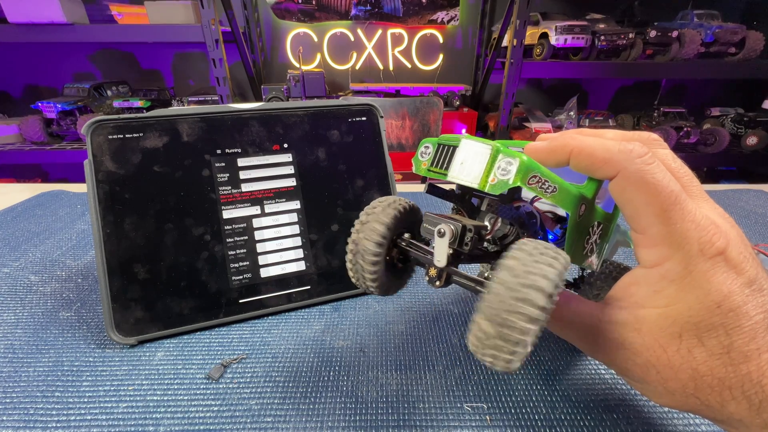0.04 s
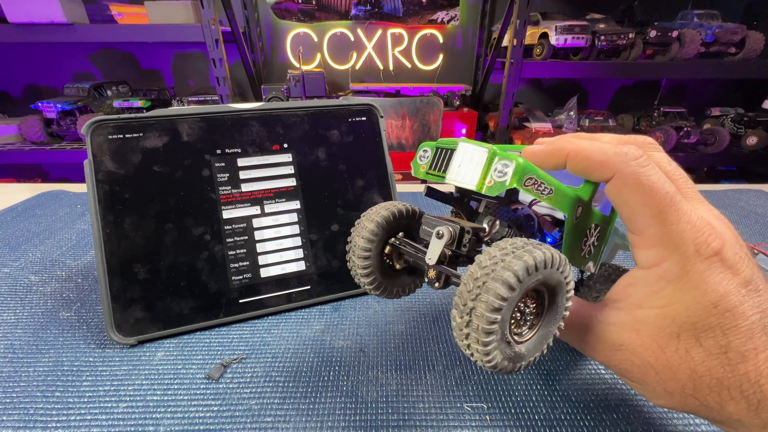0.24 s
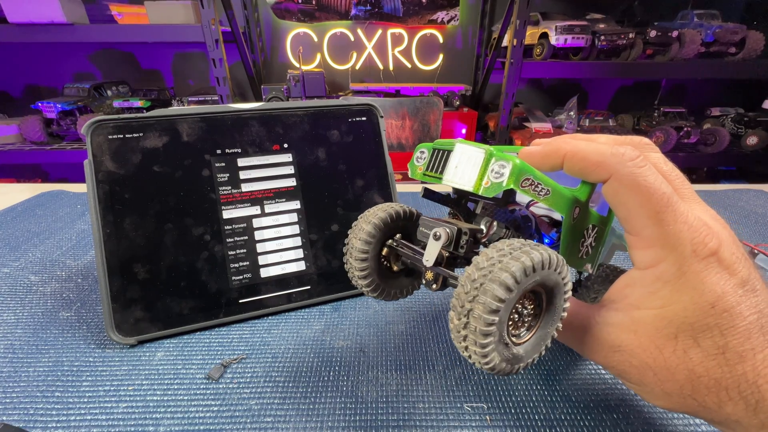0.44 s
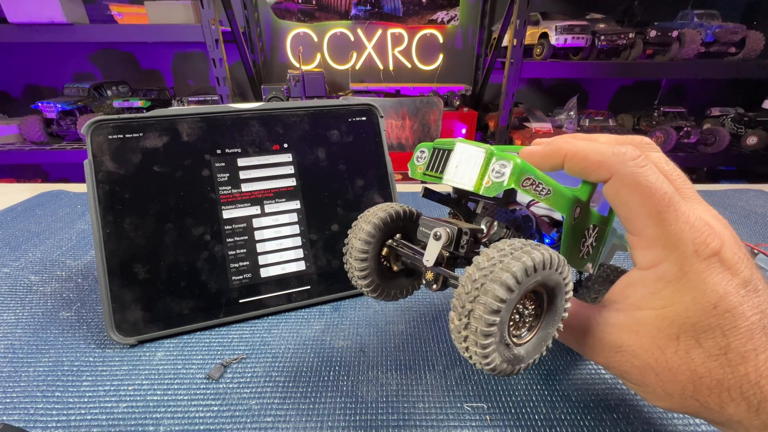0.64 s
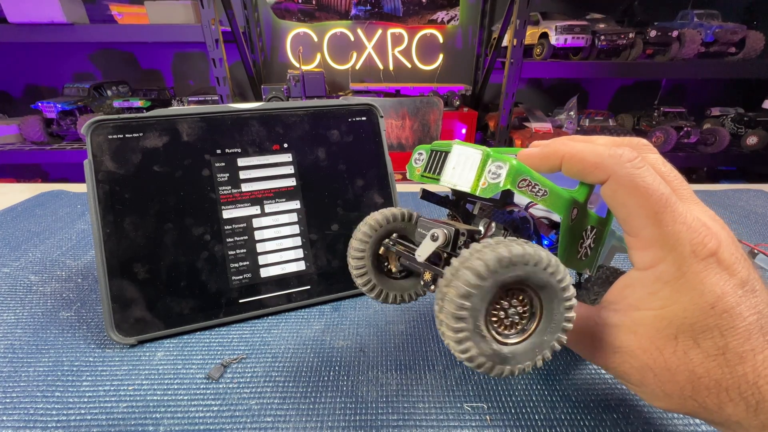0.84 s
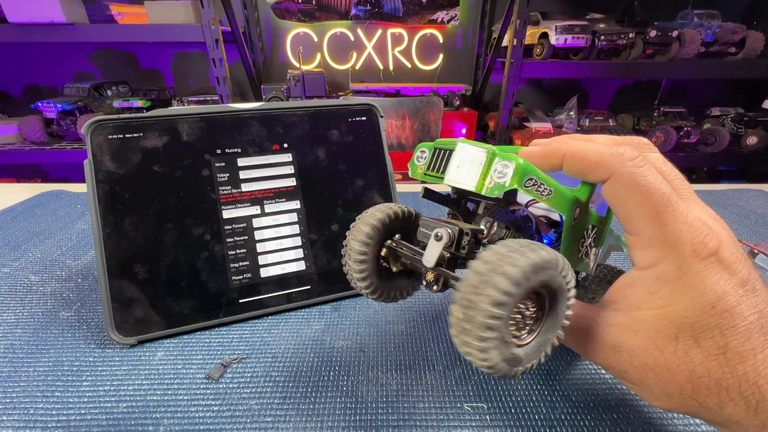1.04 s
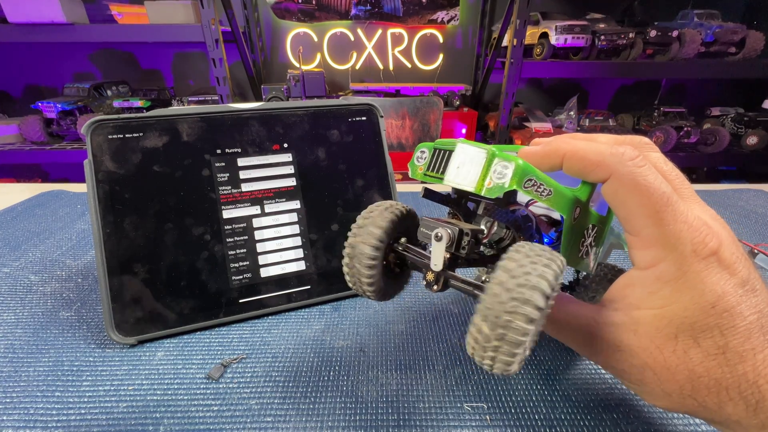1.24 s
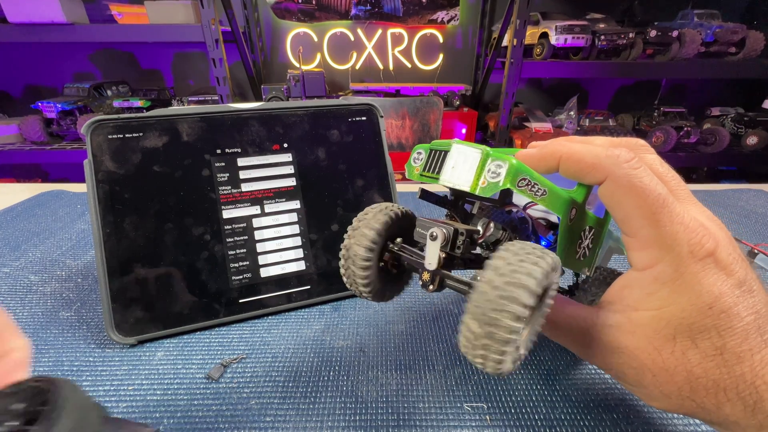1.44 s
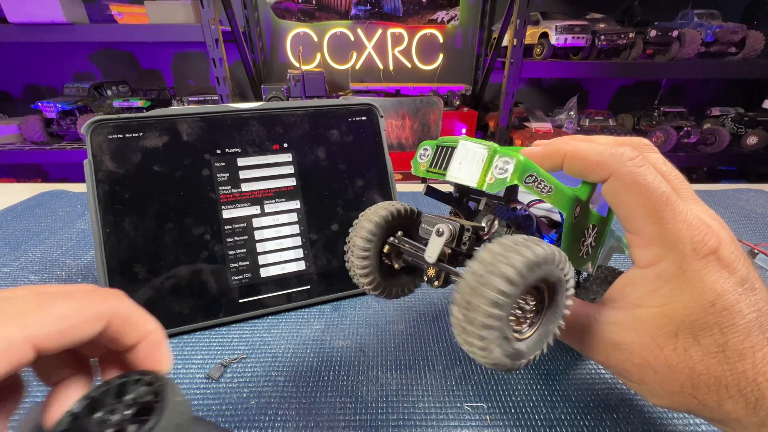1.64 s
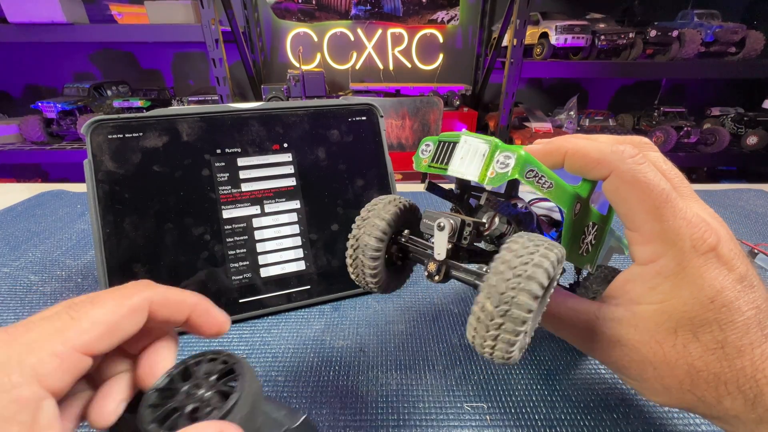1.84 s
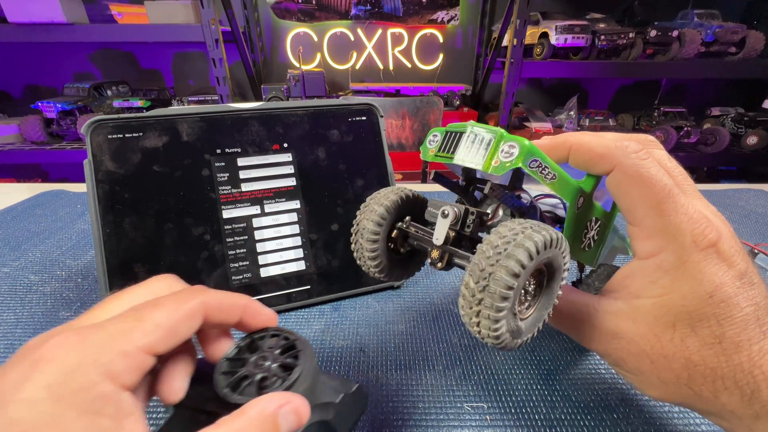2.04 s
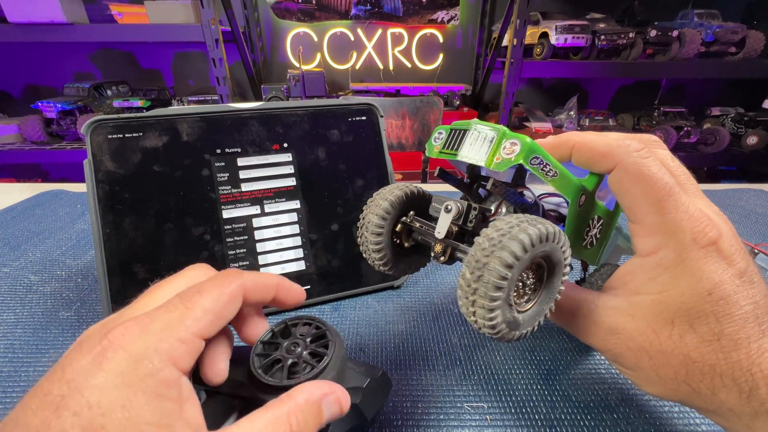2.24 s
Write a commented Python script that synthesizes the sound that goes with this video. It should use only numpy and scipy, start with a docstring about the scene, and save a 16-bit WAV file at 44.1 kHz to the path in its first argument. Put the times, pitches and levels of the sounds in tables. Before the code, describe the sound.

A toy crawler's steering servo buzzes in brief, raspy bursts, close to a stereo microphone in a small room; two heavy thuds come early, then whirs crowd together with light ticks and softer bumps over faint hiss.

```python
"""On a work table in a small room, a steering servo swings a toy crawler's front wheels from side to side,
close by. Random impacts of gear teeth, coloured by the case, rasp in short bursts; gliding narrow-band tones
are the whine. Noise bands make linkage ticks, the knocks of bumps and rubbing fingers, and short sine bursts
the joint squeaks. Bumps boom as falling thuds, decaying table modes and a rattle; a short noise tail is the
room's answer. Beneath lie a low rumble and a soft hiss."""
import sys
import numpy as np
from scipy import signal
from scipy.fft import rfft, irfft, next_fast_len
from scipy.io import wavfile
from scipy.ndimage import uniform_filter1d, map_coordinates

SR = 44100
rng = np.random.default_rng(int(sys.argv[2]) if len(sys.argv) > 2 else 0)


def pcm_store(signal):
    """Save signal as 16-bit PCM."""
    levels = np.round(np.clip(np.atleast_2d(signal), -1, 1) * 32767)
    wavfile.write(sys.argv[1], SR, levels.astype(np.int16).T)


N = 101429  # length in samples

# Servo moves. Each row: start in seconds, length in seconds, first and last level in dB before NEAR_DB.
MOVES = [(-0.02, 0.036, -55, -52), (0.022, 0.056, -47, -49.5), (0.682, 0.099, -64, -48),
         (0.825, 0.033, -45.5, -51), (0.85, 0.1, -44, -44), (0.958, 0.073, -55, -46.5),
         (1.03, 0.079, -48, -55.5), (1.101, 0.087, -43.5, -42.5), (1.2, 0.063, -58.5, -51.5),
         (1.404, 0.093, -53.5, -41.5), (1.516, 0.045, -63, -51), (1.569, 0.15, -47, -55),
         (1.727, 0.1, -44, -45), (1.935, 0.038, -59.5, -56.5)]
SPIN_UP_S, COAST_S = 0.019, 0.012
# Tooth contacts a second, timing scatter in periods, size scatter in dB.
TOOTH_HZ, TOOTH_SCATTER, TOOTH_DB = 2305, .35, 4
# Uneven gear load in random knots a second and dB; sliding noise in dB against the contacts.
GRIND_RATE, GRIND_DB, SLIDE_DB = 130, 1, 1
PATCH_DB = 3  # random swelling of narrow bands
# Servo case response on the left. Each row: frequency in Hz, relative level in dB.
CASE_RESPONSE = [(60, -60), (400, -40), (650, -11.5), (1100, -13), (1400, -21), (1620, -14), (2200, -20),
                 (3300, -11.5), (3800, -17.5), (4800, -10.5), (5500, -6), (6100, -2.5), (7200, -1.5),
                 (9200, 1), (10600, -6.5), (11800, -5), (13000, -17), (14000, -5.5), (14900, -14),
                 (15800, -18)]
# Balance of the case. Each row: frequency in Hz, left minus right in dB.
CASE_BALANCE = [(1000, 0), (2700, -2.5), (4200, 10), (5000, 2), (6000, 13), (7000, 7), (9000, 4),
                (10500, -0.5)]
# Likeness of the case sound at left and right. Each row: frequency in Hz, correlation.
CASE_CORRELATION = [(300, 0.59), (2000, 0.3), (8000, 0.75), (12000, 0.88)]
# Case resonances under heavy load. Each row: centre in Hz, width in Hz, relative level in dB.
CASE_MODES = [(2710, 79, -7.5), (4210, 430, -11), (6090, 290, 0), (6420, 760, -4)]
# Full load, level of the ringing there, and the power of load with which the ringing grows.
LOAD_DB, MODE_DB, MODE_GROWTH = -42, -4.5, 2.2
NEAR_DB = 4  # gain of the servo, close by

# Gear whines. Each row: start in seconds, length in seconds, first Hz, last Hz, level in dB.
WHINES = [(0.034, 0.028, 2300, 2400, -58), (0.98, 0.073, 7100, 8210, -48.5),
          (1.215, 0.042, 8100, 8000, -56), (1.655, 0.07, 7100, 4600, -60), (1.481, .028, 7500, 5860, -34.5),
          (1.596, 0.029, 2750, 2706, -56.5), (0.857, 0.062, 5950, 6200, -44),
          (1.125, 0.08, 6100, 6300, -47), (1.788, 0.063, 7700, 8100, -47)]
WHINE_WIDTH_SHARE, WHINE_PAN_DB = .025, 12.5  # random knot rate per Hz of pitch; lean to the left
NEXT_GEAR_RATIO, NEXT_GEAR_DB = 1.35, -11.5  # mesh tone of the next gear stage

# Linkage ticks, and the bright knocks of some bumps. Each row: start in seconds, level in dB, centre in Hz,
# width in octaves, t60 in seconds.
TICKS = [(.186, -31.5, 1600, 0.13, 0.017), (.186, -39, 2880, 0.19, 0.022), (0.187, -36.5, 5000, 0.8, 0.019),
         (0.3082, -31.5, 965, 0.11, 0.13), (1.578, -39.5, 400, 1.5, .03), (.185, -40.5, 378, 0.34, 0.036),
         (0.2374, -32, 6060, 0.27, 0.0068), (.305, -26.5, 2460, .12, 0.018),
         (.352, -35.5, 3270, 1.14, 0.03), (.8, -46, 1760, 0.42, 0.026), (1.027, -37, 9900, 0.37, 0.019),
         (1.029, -41.5, 1760, 2.9, 0.13), (1.552, -41.5, 6540, 0.36, 0.041),
         (1.701, -39.5, 2500, 0.47, 0.038), (2, -40.5, 4840, 1.6, 0.011)]
# Joint squeaks. Each row: middle in seconds, level in dB.
SQUEAKS = [(.802, -37), (0.939, -47), (1.059, -43.5), (1.704, -40)]
SQUEAK_HZ, SQUEAK_WIDTH_S, LINKAGE_PAN_DB = 1482, 0.0029, 7

# Bumps on the table. Each row: start in seconds, thud level in dB, final thud pitch in Hz, thud rise in seconds,
# ring level in dB, ring cut-off in Hz, rattle level in dB.
BUMPS = [(.187, -23, 64.7, 0.0097, -30, 124, -43), (.309, -11.5, 78, 0.0076, -23, 208, -27),
         (0.3561, -10, 97, 0.0053, -25, 282, -26), (0.7436, -22, 79.8, 0.0089, -36, 145, -49),
         (1.0409, -22, 79.7, 0.0062, -32.5, 127, -44.5), (1.202, -34, 69, 0.009, -37.5, 139, -52.5),
         (1.4974, -26.5, 82.5, .015, -33.5, 143, -44), (1.5817, -22.5, 73, 0.0058, -33, 146, -45.5),
         (1.786, -43, 180.3, 0.011, -48, 293, -53), (1.8009, -29, 67, 0.009, -35.5, 130, -48.5)]
THUD_CHIRP, THUD_CHIRP_S = 1.4, .012  # high bending waves arrive first: share of extra pitch, its decay
# Table and room modes. Each row: frequency in Hz, relative level in dB, t60 in seconds.
TABLE_MODES = [(59.04, -1.5, 0.41), (91.05, 1.5, 0.38), (108, -8, 0.63), (145, -3, 0.27),
               (173.8, -4.5, 0.26), (197, -2.5, 0.17), (219.1, -7.5, 0.45), (245.7, 2, 0.27),
               (294.4, 3, 0.12), (320.3, -7, 0.3), (365, -3.5, 0.17)]
RING_DELAY_S, RING_RISE_S = .012, 0.01  # the ring builds as waves return from the edges
MODE_SPREAD = .35  # phase scatter of each mode, radians
# Rattle spectrum. Each row: frequency in Hz, relative level in dB.
RATTLE_SPECTRUM = [(30, -17), (200, 7.5), (350, 17.5), (450, -6.5), (640, -4), (740, -3), (1000, 1.5),
                   (1300, -4), (1650, -0.5), (2100, -14.5), (4000, -15), (8000, -31), (14000, -68)]
RATTLE_RISE_S, RATTLE_T60_S = .002, .14
RATTLE_RATE, RATTLE_ROUGH_DB = 122.2, 1.5  # random knots a second, unevenness
# Loose things on the table. Each row: frequency in Hz, relative level in dB, t60 in seconds.
LOOSE_THINGS = [(406, -17, 0.27), (477.6, -10.5, 0.13), (515, -9.5, .18), (613, -10.5, 0.13),
                (651, -12, .15), (923, -15, 0.22), (1033, -15.5, .14), (1610, -30, 0.35)]
LOOSE_DETUNE = .015  # things shift a little at each bump
BUMP_PAN_DB = 5.8

# Fingers shifting on plastic. Each row: middle in seconds, half length in seconds, centre in Hz, level in dB.
SCUFFS = [(0.052, 0.017, 780, -60.5), (0.702, 0.018, 1020, -59.5), (0.703, 0.016, 2300, -58),
          (0.683, 0.031, 5000, -57.5), (1.447, 0.019, 980, -56), (2.111, 0.11, 4330, -62)]
SCUFF_OCTAVES = 0.25

# Level of the hiss. Each row: time in seconds, level in dB.
HISS_LEVEL = [(0, -58), (.15, -54.5), (0.358, -49.5), (.46, -78), (.52, -78.5), (.58, -62), (0.634, -77),
              (.68, -51), (.8, -56), (1.05, -53.5), (1.25, -54), (1.315, -59.5), (1.45, -53), (1.8, -52),
              (1.881, -57), (2.172, -53.5), (2.227, -63.5), (2.3, -53.5)]
# Hiss spectrum. Each row: frequency in Hz, relative level in dB.
HISS_SPECTRUM = [(450, -44), (707, -9.5), (1080, -5.5), (1940, -9.5), (2670, -5), (7670, -4),
                 (13000, -18.5), (15800, -6)]
# Likeness of diffuse noise at left and right. Each row: frequency in Hz, correlation.
NOISE_CORRELATION = [(100, 0.96), (1000, 0.17), (8000, 0.089)]
NOISE_PAN_DB = 5.5
# Level of the rumble. Each row: time in seconds, level in dB.
RUMBLE_LEVEL = [(0, -70), (0.066, -55.5), (.14, -69.5), (.6, -62), (.7, -58.5), (.95, -69), (1.38, -62.5),
                (1.46, -62.5), (1.6, -55.5), (2.0, -63.5)]
# Rumble spectrum. Each row: frequency in Hz, relative level in dB.
RUMBLE_SPECTRUM = [(15, -32), (28, -7), (60, 5.5), (115, 2.5), (300, -5.5), (480, -17.5), (1100, -33),
                   (2000, -53)]

# Room decay. Each row: frequency in Hz, t60 in seconds.
ROOM_T60 = [(100, 0.46), (400, 0.43), (1500, 0.56), (5000, 0.33), (12000, 0.035)]
ROOM_DB, DIFFUSE_HZ = -13, 143  # level of the tail; the room is diffuse above this frequency
# Phase of the microphone pair. Each row: frequency in Hz, lead of the left in radians.
PAIR_PHASE = [(20, -1.5), (100, 0.55), (380, 0.46), (620, 2), (3200, 1.3), (4800, -0.04), (5900, 1.8),
              (7700, -1.8), (8300, -6), (9700, -9), (11600, -12), (12800, -14), (13100, -16.5),
              (14600, -18), (15000, -16.5)]
LOW_CUT_HZ, TOP_HZ = 30, 15900


def amp(db):
    """Decibels to amplitude ratio."""
    return 10 ** (np.asarray(db) / 20)


def unit(x):
    """Normalise to rms 1."""
    return x / np.sqrt(np.mean(x ** 2) + 1e-20)


def along(points, hz):
    """Interpolate (Hz, value) points on a logarithmic frequency axis."""
    f, v = np.transpose(points)
    return np.interp(np.log(hz + 1), np.log(f + 1), v)


def since(s):
    """Elapsed seconds since s, zero before it."""
    return np.maximum(np.arange(N) / SR - s, 0)


def wobble(rate):
    """Low-pass randomness: a smooth curve through rate random knots a second."""
    knots = rng.standard_normal(int(N * rate / SR) + 4)
    return map_coordinates(knots, [np.arange(N) * rate / SR])


def filtered(x, response):
    """Linear filtering: the spectrum of x times a response of frequency."""
    m = next_fast_len(N + SR // 2)
    return irfft(rfft(x, m) * response(np.fft.rfftfreq(m, 1 / SR)), m)[..., :N]


def octave_band(centre_hz, octaves, steepness):
    """Resonant colouring: stereo noise in a band symmetric in octaves, rms 1."""
    def response(hz):
        distance = np.log2((hz + 1) / centre_hz) / octaves
        return 1 / (1 + distance ** 2) ** steepness
    return unit(filtered(rng.standard_normal((2, N)), response))


def pan(db):
    """Level difference: left and right gains whose mean is 1."""
    g = amp(np.array([[.5], [-.5]]) * db)
    return g / g.mean(axis=0)


def spread(pair, spectrum, correlation):
    """Partial coherence: two signals as mid and side of coloured stereo, rms 1."""
    def response(hz):
        turn = np.arccos(np.clip(along(correlation, hz), -.99, .99)) / 2
        return amp(along(spectrum, hz)) * [np.cos(turn), np.sin(turn)]
    mid, side = filtered(pair, response)
    return unit(np.array([mid + side, mid - side]))


def noise(spectrum):
    """Diffuse field: partly coherent stereo noise, leaning left."""
    return spread(rng.standard_normal((2, N)), spectrum, NOISE_CORRELATION) * pan(NOISE_PAN_DB)


def servo():
    """Forced and resonant response: teeth excite the case, whose modes ring under load as moves start and coast."""
    effort = np.zeros(N)
    for s, length, first_db, last_db in MOVES:
        t = since(s)
        spin = np.minimum(t / SPIN_UP_S, 1) * np.exp(-since(s + length) / COAST_S)
        load = amp(np.interp(t, [0, length], [first_db, last_db]) - LOAD_DB)
        effort = np.hypot(effort, spin * load)
    mesh = patchy(np.array([teeth(), teeth()]))
    rasp = spread(mesh, CASE_RESPONSE, CASE_CORRELATION)

    def resonances(hz):
        return sum(amp(db) / (1 + 1j * (hz - c) / width) ** 2 for c, width, db in CASE_MODES)
    ring = unit(filtered(mesh[0], resonances))
    sound = effort * rasp + amp(MODE_DB) * effort ** MODE_GROWTH * ring
    left, right = sound * amp(LOAD_DB + NEAR_DB + GRIND_DB * wobble(GRIND_RATE))
    return np.array([left, filtered(right, lambda hz: amp(-along(CASE_BALANCE, hz)))])


def teeth():
    """Impact and friction: uneven tooth contacts over the noise of sliding flanks."""
    slide = rng.standard_normal(N)
    timing, size = rng.standard_normal((2, int(TOOTH_HZ * N / SR)))
    at = (np.arange(len(timing)) + TOOTH_SCATTER * timing) * SR / TOOTH_HZ
    contacts = np.bincount(np.clip(at, 0, N - 1).astype(int), amp(TOOTH_DB * size), N)
    return unit(contacts) + amp(SLIDE_DB) * slide


def patchy(x):
    """Random modulation: narrow bands swell and fade, alike in both channels."""
    z = signal.stft(x, nperseg=1024)[2]
    field = rng.standard_normal(z.shape[1:])
    for axis in (0, 1):
        field = uniform_filter1d(field, size=4, axis=axis)
    return signal.istft(z * amp(PATCH_DB * unit(field)), nperseg=1024)[1][:, :N]


def whines():
    """Gear-mesh frequency: two fuzzy tones glide as the motor speeds up or slows."""
    def fuzzy_tone(phase, width):
        return np.array([wobble(width) * np.cos(phase) + wobble(width) * np.sin(phase) for _ in range(2)])
    out = np.zeros((2, N))
    for s, length, first_hz, last_hz, db in WHINES:
        u = np.minimum(since(s) / length, 1)
        phase = 2 * np.pi * np.cumsum(first_hz + (last_hz - first_hz) * u) / SR
        width = WHINE_WIDTH_SHARE * first_hz
        next_gear = amp(NEXT_GEAR_DB) * fuzzy_tone(NEXT_GEAR_RATIO * phase, width)
        out += amp(db) * np.sin(np.pi * u) * (fuzzy_tone(phase, width) + next_gear)
    return out * pan(WHINE_PAN_DB)


def linkage():
    """Impact and stick-slip: joints tick as the slack is taken up, bumps add short decaying knocks, and now and
    then a joint gives a tiny squeak."""
    out = np.zeros((2, N))
    for s, db, centre_hz, octaves, t60 in TICKS:
        t = since(s)
        band = octave_band(centre_hz, octaves, 1.34)
        out += (t > 0) * amp(db - 60 * t / t60) * (band + band[0]) / 2  # the sides share the left noise
    for s, db in SQUEAKS:
        t = np.arange(N) / SR - s
        out += amp(db) * np.exp(-(t / SQUEAK_WIDTH_S) ** 2) * np.sin(2 * np.pi * SQUEAK_HZ * t)
    return out * pan(LINKAGE_PAN_DB)


def bumps():
    """Impulsive excitation: each bump gives a thud, a table ring and a rattle of loose things."""
    low, shake = np.zeros((2, N)), np.zeros(N)
    for s, thud_db, hz, rise_s, ring_db, cut_hz, rattle_db in BUMPS:
        t = since(s)
        low -= amp(thud_db) * thud(t, hz, rise_s)
        low += table_ring(s, ring_db, cut_hz)
        jolt = amp(rattle_db) * (1 - np.exp(-t / RATTLE_RISE_S))
        shake += jolt * amp(-60 * t / RATTLE_T60_S)
        low += jolt * loose_things(t)
    rattle = shake * amp(RATTLE_ROUGH_DB * wobble(RATTLE_RATE)) * noise(RATTLE_SPECTRUM)
    return low * pan(BUMP_PAN_DB) + rattle


def thud(t, hz, rise_s):
    """Dispersion of bending waves: a pulse whose pitch falls to hz."""
    cycles = hz * (t + THUD_CHIRP * THUD_CHIRP_S * (1 - np.exp(-t / THUD_CHIRP_S)))
    return (t / rise_s * np.exp(1 - t / rise_s)) ** 2 * np.sin(2 * np.pi * cycles)


def table_ring(s, ring_db, cut_hz):
    """Modal superposition: decaying sines, weaker above the cut-off."""
    t, late = since(s), since(s + RING_DELAY_S)
    build_up = 1 - np.exp(-(late / RING_RISE_S) ** 2)
    out = np.zeros((2, N))
    for mode_hz, db, t60 in TABLE_MODES:
        strength = amp(ring_db + db + rng.normal(0, 1)) / np.hypot(1, (mode_hz / cut_hz) ** 2)
        phase = 2 * np.pi * mode_hz * t + rng.normal(0, MODE_SPREAD, (2, 1))
        out += strength * amp(-60 * late / t60) * build_up * np.sin(phase)
    return out


def loose_things(t):
    """Free vibration: slightly detuned decaying sines."""
    out = np.zeros(N)
    for hz, db, t60 in LOOSE_THINGS:
        shifted_hz = hz * (1 + rng.normal(0, LOOSE_DETUNE))
        out += amp(db - 60 * t / t60) * np.sin(2 * np.pi * (shifted_hz * t + rng.random()))
    return out


def scuffs():
    """Friction noise: fingers on plastic rub in soft, brief swells."""
    t = np.arange(N) / SR
    out = np.zeros((2, N))
    for s, half, hz, db in SCUFFS:
        out += amp(db) * np.exp(-((t - s) / half) ** 2) * octave_band(hz, SCUFF_OCTAVES, 1.55)
    return out * pan(NOISE_PAN_DB)


def room(x):
    """Reverberation: a short noise tail above the deep modes, in which the treble dies first."""
    hz, t, z = signal.stft(rng.standard_normal((2, SR // 2)), SR, nperseg=256)
    decay = amp(-60 * t / along(ROOM_T60, hz)[:, None])
    tail = signal.istft(z * decay, SR, nperseg=256)[1]
    wet = signal.fftconvolve(x, tail / np.linalg.norm(tail[0]), axes=1)[:, :N]
    return filtered(wet, lambda hz: hz / np.hypot(hz, DIFFUSE_HZ))


def background():
    """Stationary noise under level curves: a rumble swells as the toy is handled, and a soft hiss dips briefly."""
    hiss_db = np.interp(since(0), *np.transpose(HISS_LEVEL))
    rumble_db = np.interp(since(0), *np.transpose(RUMBLE_LEVEL))
    return amp(hiss_db) * noise(HISS_SPECTRUM) + amp(rumble_db) * noise(RUMBLE_SPECTRUM)


def scene():
    """Superposition: near sources, their reverberation and the background."""
    near = servo() + whines() + linkage() + bumps() + scuffs()
    return near + amp(ROOM_DB) * room(near) + background()


def record(dry):
    """Phase difference and band limits: two microphones, thin in the deepest bass, silent above TOP_HZ."""
    def low_cut(hz):
        return -hz ** 2 / (LOW_CUT_HZ ** 2 - hz ** 2 + 1j * hz * LOW_CUT_HZ)
    pair = filtered(dry, lambda hz: np.exp(1j * np.array([[.5], [-.5]]) * along(PAIR_PHASE, hz)))
    return filtered(pair, lambda hz: low_cut(hz) * (hz < TOP_HZ))


dry = scene()
out = record(dry)
pcm_store(out)
```